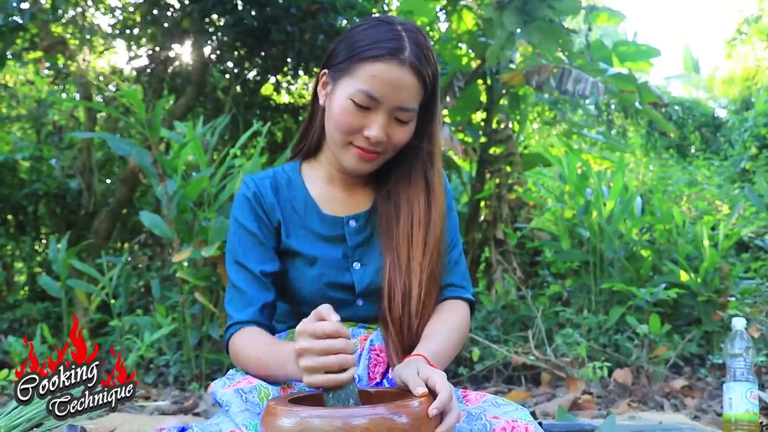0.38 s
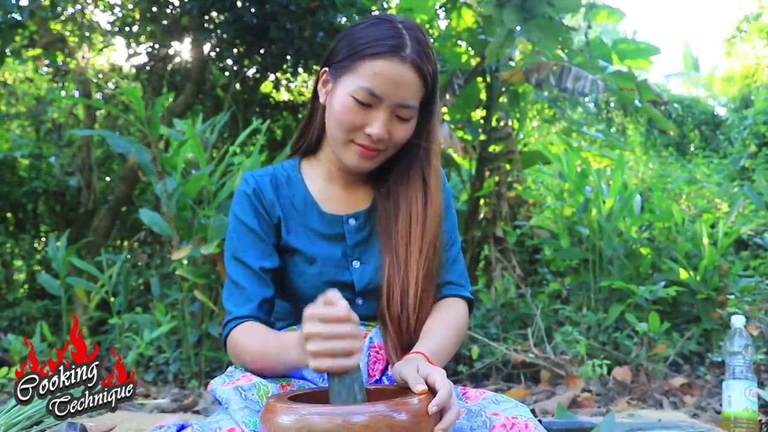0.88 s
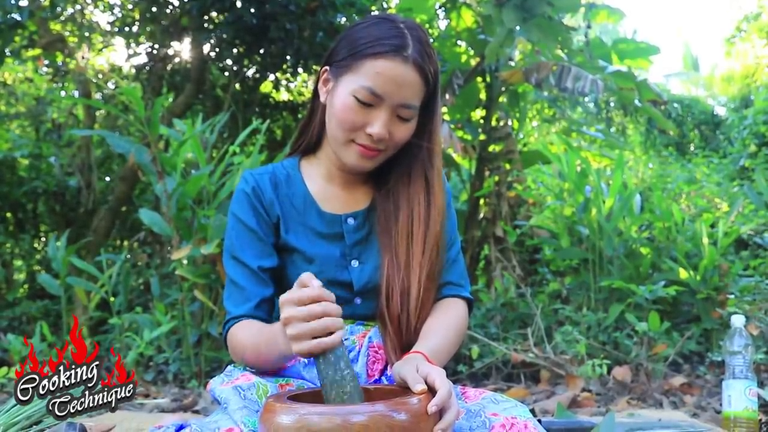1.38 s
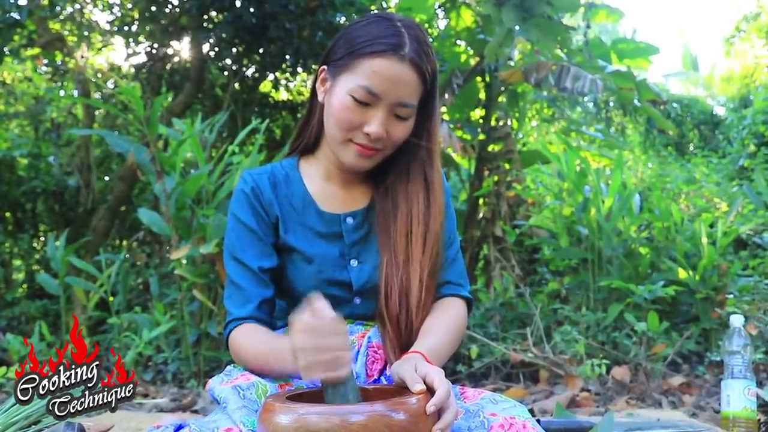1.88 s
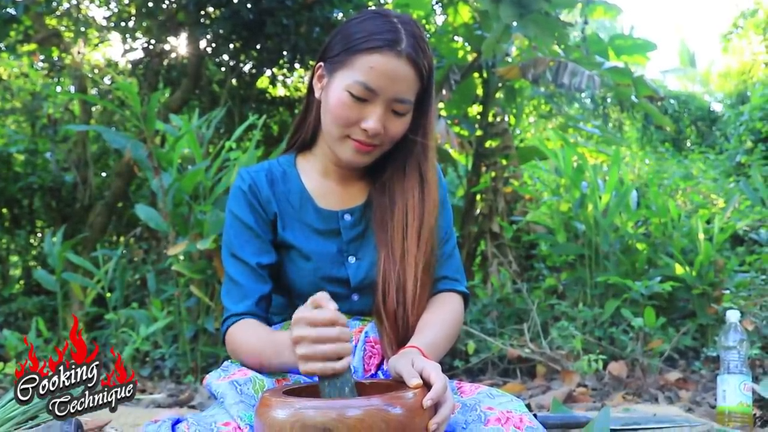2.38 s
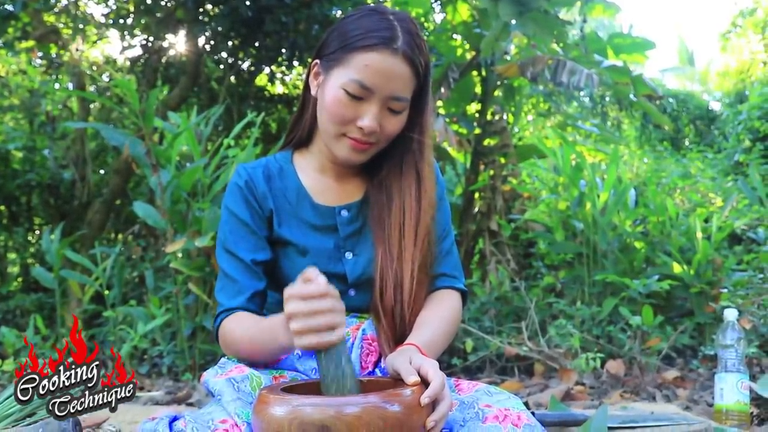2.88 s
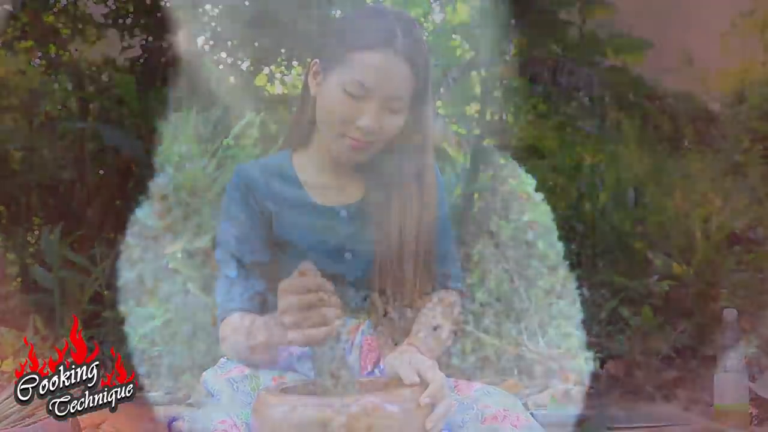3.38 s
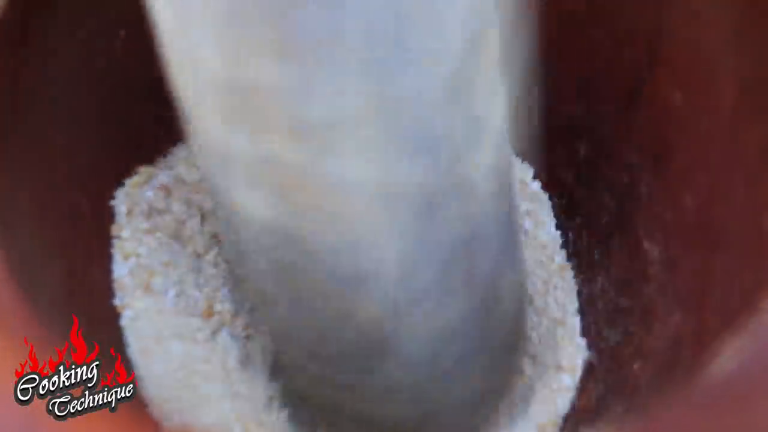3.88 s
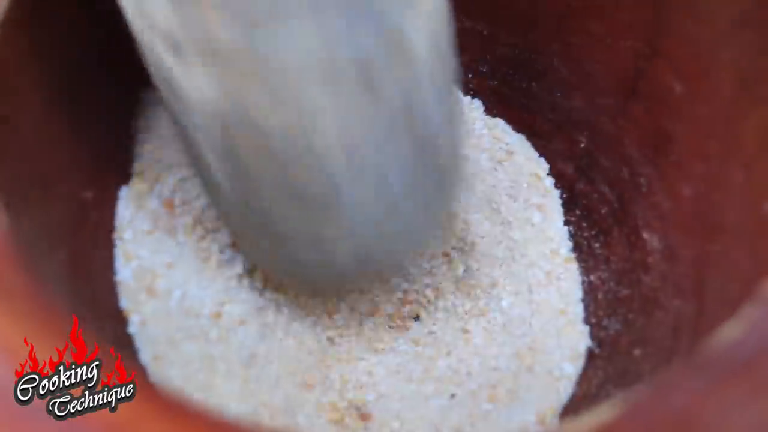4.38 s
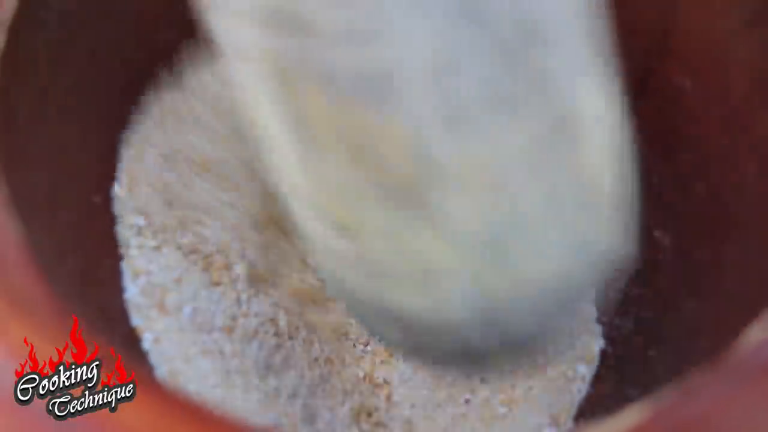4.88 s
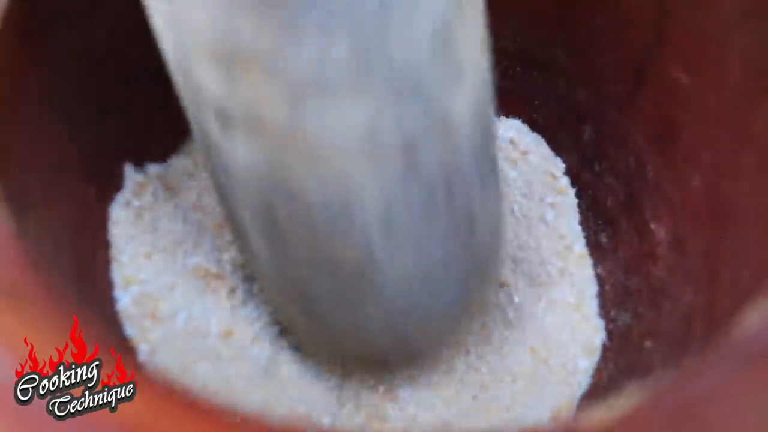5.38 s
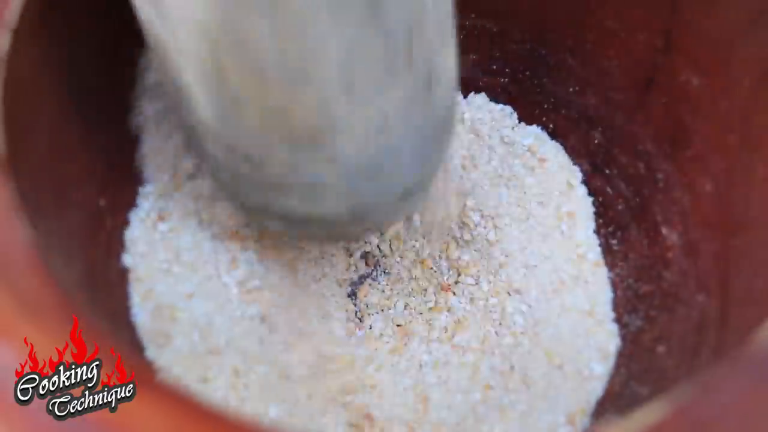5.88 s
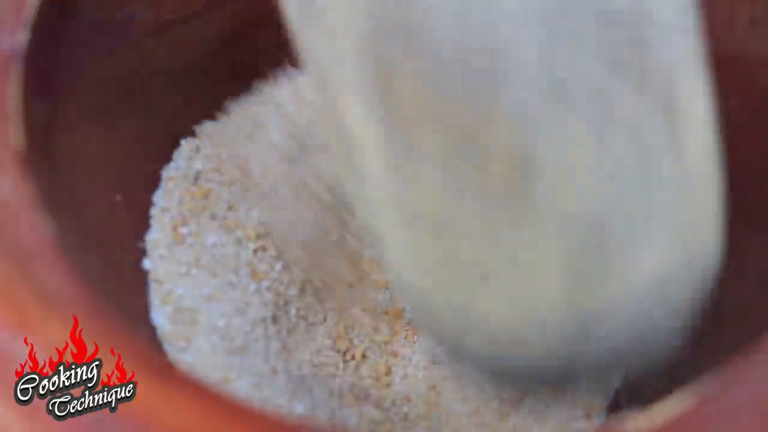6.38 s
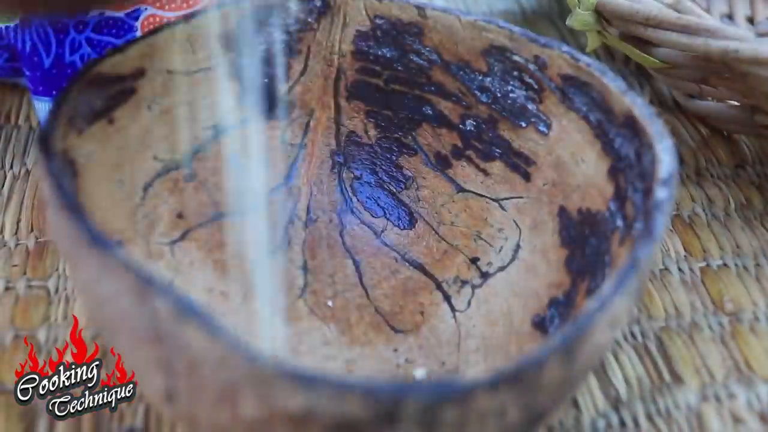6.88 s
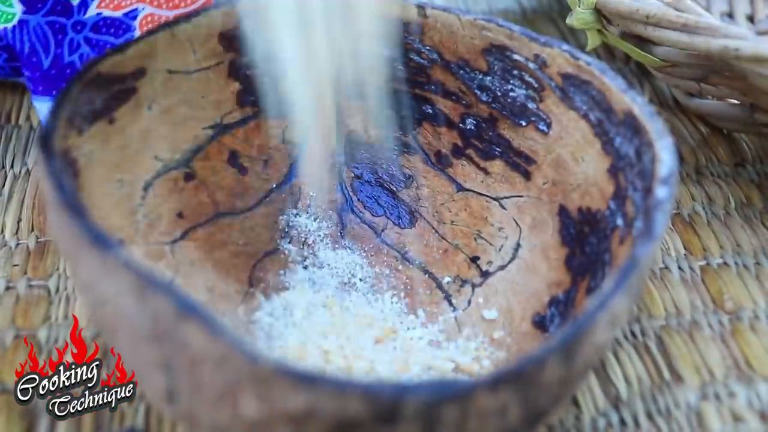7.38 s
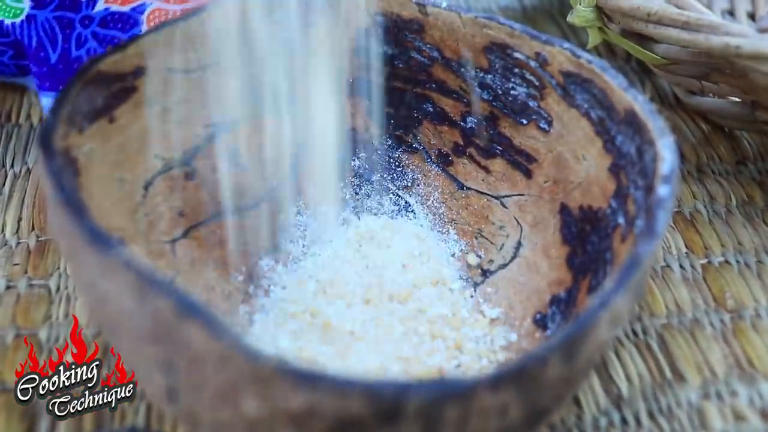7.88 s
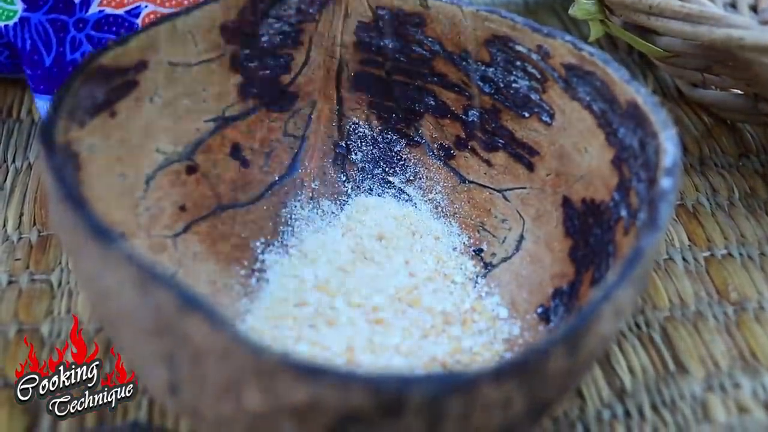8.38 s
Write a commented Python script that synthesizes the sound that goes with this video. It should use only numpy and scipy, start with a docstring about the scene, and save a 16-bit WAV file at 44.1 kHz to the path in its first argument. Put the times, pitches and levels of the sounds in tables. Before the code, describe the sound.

Outdoor pounding of grain, first from a few steps off: woody clacks with dull thuds and small puffs of grit over soft low air and insect chirps. Then the microphone is very close to the mortar, the strokes much louder and clipping, with rasping grit and cracking kernels between. The pounding stops and light dry grains patter into a hard shell bowl, with quick birdsong in the distance.

```python
"""Pounding grain outdoors

Three views of an outdoor kitchen: a pestle pounds grain in a clay mortar a few steps away, then close up, where
hard blows overload and a grinding twist follows; then grain trickles into a shell bowl. Struck modes make the blows,
random clicks the grit and patter. Garden air, insects, birds and hums are shaped noise; only the air, the lowest
close modes and the overload ceiling follow the dissolves."""
import sys
import numpy as np
from scipy import signal
from scipy.fft import rfft, irfft, next_fast_len
from scipy.io import wavfile
from scipy.ndimage import uniform_filter1d

SR = 44100
rng = np.random.default_rng(int(sys.argv[2]) if len(sys.argv) > 2 else 0)


def linear_from_db(decibels):
    """Turn decibels (scalar or array-like) into linear amplitude factors; 0 gives 1."""
    return 10 ** (np.asarray(decibels, float) / 20)


def materialize(psi):
    """Save the field psi as 16-bit PCM at rate SR to the path in sys.argv[1].

    A 1-D psi becomes a single channel; in a 2-D psi each row is a channel.
    """
    bounded = np.clip(np.atleast_2d(psi).T, -1, 1)
    quanta = np.round(bounded * 32767).astype(np.int16)
    wavfile.write(sys.argv[1], SR, quanta)


N = 375291
T = np.arange(N) / SR


def rms_one(x):
    """Scale to rms 1."""
    return x / np.sqrt(np.mean(x ** 2) + 1e-20)


def at_hz(points, hz):
    """Read a spectrum on a log frequency axis."""
    return np.interp(np.log(hz), np.log(np.array(points)[:, 0]), np.array(points)[:, 1])


def fft_grid():
    """Transform size and its bin frequencies in Hz."""
    size = next_fast_len(N)
    return size, np.maximum(np.arange(size // 2 + 1) * SR / size, 1)


def colour(x, spectrum):
    """Shape by a (Hz, dB) table; rms 1."""
    size, hz = fft_grid()
    return rms_one(irfft(rfft(x, size) * linear_from_db(at_hz(spectrum, hz)), size)[..., :N])


def tilt_right(db):
    """Left and right gains that make the right louder by db."""
    return linear_from_db([[-db / 2], [db / 2]])


def pair(alike):
    """Two noises with correlation alike."""
    mid, side = rng.standard_normal((2, N))
    alike = np.clip(alike, 0, 1)
    return np.sqrt((1 + alike) / 2) * mid + np.sqrt((1 - alike) / 2) * side * [[1], [-1]]


def flutter(rate_hz, depth_db):
    """Random wobble in dB with a new target rate_hz times a second."""
    return depth_db * np.interp(T * rate_hz, np.arange(N // 100), rng.standard_normal(N // 100))


def ring(x, hz, t60_s):
    """A resonator: a unit click sets a decaying sine of height 1 ringing."""
    radius, w = linear_from_db(-60 / (t60_s * SR)), 2 * np.pi * hz / SR
    return signal.lfilter([0, np.sin(w)], [1, -2 * radius * np.cos(w), radius * radius], x + 1e-18)


def spikes(s, sizes):
    """Clicks of given sizes at given times."""
    out = np.zeros(np.shape(sizes)[:-1] + (N,))
    out[..., np.clip(np.round(np.asarray(s) * SR).astype(int), 0, N - 1)] = sizes
    return out


def burst(s, db, rise_s, t60_s):
    """Envelopes that rise fast and die away."""
    up, down = np.exp(-1 / (rise_s * SR)), linear_from_db(-60 / (t60_s * SR))
    return signal.lfilter([1 - up], np.convolve([1, -up], [1, -down]), spikes(s, linear_from_db(db)) + 1e-18)


def strike(s, db, modes, spread_db, wide_hz):
    """Each blow gives every mode a new strength; high modes differ more between the ears."""
    out = 0
    for hz, level_db, t60_s in modes:
        draw = rng.standard_normal((len(s), 2))
        apart = draw[:, 1] * hz / (hz + wide_hz) * [[1], [-1]]
        height = linear_from_db(db + level_db + spread_db * draw[:, 0])
        out = out + ring(spikes(s, height * (1 + apart)), hz, t60_s)
    return out


def crackle(modes, envelope, alike):
    """A noisy contact drives the modes; longer rings get less drive to even out their height."""
    drive = pair(alike) * envelope
    return sum(linear_from_db(db) * ring(drive, hz, t60_s) / np.sqrt(t60_s * SR) for hz, db, t60_s in modes)


def grains(per_s, spread_db, alike):
    """Random clicks with a long tail of big ones."""
    sizes = linear_from_db(spread_db * np.minimum(rng.exponential(1, N), 4)) * (rng.random(N) < per_s / SR)
    return pair(alike) * sizes


def push(x, contact_s, cut_hz):
    """The force swells and fades over the contact time; the lowest part does not radiate."""
    shape = np.sin(np.pi * np.minimum(T[:900] / contact_s, 1)) ** 2
    soft = signal.lfilter(shape / shape.sum(), [1], x)
    return signal.lfilter(*signal.butter(2, cut_hz, "high", fs=SR), soft)


def wavering(start_s, length_s, hz0, hz1, width_hz, db, alike):
    """A narrow band of noise gliding from hz0 to hz1 under a soft window."""
    t = T[:int(length_s * SR)]
    r = np.exp(-np.pi * width_hz / SR)
    draw = rng.standard_normal((2, 2, len(t) + 4000))
    slow = signal.lfilter([1], [1, -2 * r, r * r], draw[0] + 1j * draw[1])[:, 4000:]
    mean_power = np.mean(abs(slow) ** 2)
    slow = (alike * slow[0] + np.sqrt(1 - alike ** 2) * slow) / np.sqrt(mean_power / 2)
    cycles = hz0 * t + (hz1 - hz0) * t ** 2 / (2 * length_s)
    tone = (slow * np.exp(2j * np.pi * cycles)).real
    window = np.minimum(1, np.minimum(t / 0.021, (length_s - t) / 0.032))
    out, i = np.zeros((2, N + len(t))), round(start_s * SR)
    out[:, i:i + len(t)] = linear_from_db(db) * tone * window
    return out[:, :N]


# Dissolves between views, far before and pouring after. Each row: time in seconds, share of the close view 0-1.
DISSOLVES = [(2.99, 0.0), (3.76, 1.0), (6.42, 1.0), (7.33, 0.0)]


def close_share():
    """Share of the close view over time."""
    return np.interp(T, *np.transpose(DISSOLVES))


# Likeness of the ears in garden noise. Each row: frequency in Hz, left-right correlation.
EAR_LIKENESS = [(60, 1), (240, 0.93), (950, -0.36), (3770, 0.089), (15000, -0.34)]


def air(spectrum, db):
    """Garden noise, alike in both ears in the bass only."""
    alike = np.clip(np.array(EAR_LIKENESS), [0, -.99], [SR, .99])
    mid_db, side_db = ([(hz, 10 * np.log10(1 + sign * a)) for hz, a in alike] for sign in (1, -1))
    white = rng.standard_normal((2, N))
    size, hz = fft_grid()
    gains = linear_from_db([at_hz(mid_db, hz), at_hz(side_db, hz)])
    mid, side = irfft(rfft(white, size) * gains, size)[:, :N]
    return linear_from_db(db) * colour(np.array([mid + side, mid - side]), spectrum)


# Garden air spectra in the three views. Each row: frequency in Hz, relative density in dB per Hz.
FAR_AIR = [(20, -28.5), (45, -11), (80, -5), (220, -7), (500, -14.5), (1000, -18.5), (2500, -25),
           (10000, -32), (16000, -43)]
CLOSE_AIR = [(20, -21), (45, -3.5), (100, -2.5), (320, -3.5), (500, -12), (1500, -15.5), (4000, -22),
             (8000, -26.5), (13000, -29.5), (16000, -39)]
POUR_AIR = [(20, -16.5), (45, -7), (130, 4.5), (250, -11.5), (600, -16), (1500, -20), (3400, -25.5),
            (8000, -21.5), (14000, -34.5), (16000, -37.5)]
# Rms level in dB of the far, close and pouring air.
AIR_LEVELS_DB = [-63, -61, -60.5]


def garden_air():
    """Three rumbling noise beds that cross over with the dissolves."""
    close = close_share()
    shares = [(1 - close) * (T < 5), close, (1 - close) * (T >= 5)]
    spectra = (FAR_AIR, CLOSE_AIR, POUR_AIR)
    return sum(share * air(spectrum, db) for share, spectrum, db in zip(shares, spectra, AIR_LEVELS_DB))


# Far hums, drones and whines. Each row: start in seconds, length in seconds, Hz, width in Hz, level in dB
# before flutter.
FAR_HUMS = [(0, 4.26, 76.14, 10.7, -67.5), (.2, 3.086, 454.5, 12, -76.5), (0, 3.4, 5000, 390, -81),
            (1.0, 1.4, 200, 8, -73), (6.2, .3, 780, 8, -74), (1.78, 0.595, 5000, 250, -77),
            (3.6, 2.9, 335.3, 7.2, -75), (4.86, .5, 2580, 260, -65), (6.95, 0.834, 134, 12.94, -66),
            (7.85, .5, 158, 27.3, -67.5), (7.62, 0.217, 1170, 10.73, -77.5), (7.87, .17, 1179, 8.8, -72)]


def hums():
    """Narrow noise bands that swell and sink a little; low ones are nearly alike in both ears."""
    out = 0
    for s, length_s, hz, width_hz, db in FAR_HUMS:
        alike, depth_db = (.9, 1.0) if hz < 300 else (.2, 2.5)
        out = out + wavering(s, length_s, hz, hz, width_hz, db, alike) * linear_from_db(flutter(4.6, depth_db))
    return out


# Bouts of chirping. Each row: first second, last second, period in seconds, kind, dB added to the kind's level.
CHIRP_BOUTS = [(.015, 3.4, .135, 0, 0), (2.06, 2.3, .146, 1, -8), (2.47, 3.0, .146, 1, -8),
               (3.45, 6.55, .1425, 1, 0), (3.5, 6.5, .1392, 0, 0), (6.735, 8.5, .1445, 1, 2)]
# Two kinds of insect. Each row: Hz, chirp length in seconds, width in Hz, level in dB before gate and bout.
INSECT_KINDS = [(8160, .05, 83, -79), (7710, .11, 230, -72)]


def insects():
    """Steady chirps: a narrow band gated once a period."""
    out = 0
    for first, last, period_s, kind, near_db in CHIRP_BOUTS:
        hz, chirp_s, width_hz, db = INSECT_KINDS[kind]
        phase = (T - first) % period_s / chirp_s
        gate = np.sin(np.pi * np.minimum(phase, 1)) ** .7 + .2   # a faint buzz stays between chirps
        out = out + gate * wavering(first, last - first, hz, hz, width_hz, db + near_db, alike=.3)
    return out


# Hoarse far calls. Each row: start in seconds, length in seconds, start Hz, end Hz, level in dB.
HOARSE_CALLS = [(.71, 0.095, 2750, 2450, -70.5), (2.167, .09, 2750, 2300, -60),
                (2.221, 0.14, 2700, 2575, -70.5), (3.864, 0.11, 2200, 2280, -65.5),
                (4.63, .06, 2070, 2200, -66), (5.55, .12, 2200, 2105, -69), (6.3, .22, 2200, 2150, -64.5)]
# Rising whistle: start in seconds, length in seconds, start Hz, end Hz, width in Hz, level in dB at the top.
RISING_WHISTLE = (1.63, .165, 3450, 5350, 120, -62)
# Clearer warble notes. Each row: start in seconds, length in seconds, start Hz, end Hz, level in dB.
CLEAR_NOTES = [(7.0, .11, 2300, 2080, -63.5), (7.36, 0.098, 2250, 2210, -64.5),
               (7.4, .066, 1860, 1820, -64), (7.64, .07, 1860, 1770, -64), (7.72, 0.096, 2200, 2250, -65.5),
               (7.83, 0.058, 1825, 1840, -60), (8.11, 0.058, 1900, 1800, -63)]
# Run-together echoes of the warble: start in seconds, length in seconds, start Hz, end Hz, width in Hz, level in dB.
WARBLE_ECHO = (6.5, 1.95, 2200, 1770, 800, -70.5)
# Far trills. Each row: start in seconds, length in seconds, start Hz, end Hz, width in Hz, level in dB before beating.
FAR_TRILLS = [(7.14, .2, 2910, 2777, 250, -70.5), (7.969, .23, 2990, 2790, 240, -71)]


def birds():
    """Hoarse calls, some with an octave, a whistle, a warble of quick gliding notes and two trills."""
    out = 0
    for s, length_s, hz0, hz1, db in HOARSE_CALLS:
        out = out + wavering(s, length_s, hz0, hz1, 600, db, alike=.2)
        if hz0 < 2300:
            out += wavering(s, length_s, 2 * hz0, 2 * hz1, 450, db - 3.5, alike=.2)
    along = (T - RISING_WHISTLE[0]) / RISING_WHISTLE[1]
    swell_db = 14 * np.clip(10 * (along - 2 / 3), -1, 0)   # faint until nearly two thirds of the way up
    out += wavering(*RISING_WHISTLE, alike=.2) * linear_from_db(swell_db)

    # a hundred fainter notes, unevenly spaced
    when, pitch, glide, size = rng.random((100, 4)).T
    start_s = np.interp((np.arange(100) + when) / 100, [0, 1], (6.7, 8.4))
    start_hz = np.interp(pitch, [0, 1], (1350, 2300))
    end_hz = start_hz * (0.99 + 0.1996 * glide)
    faint = zip(start_s, 0.047 + 0.052 * size, start_hz, end_hz, -76 + 8.1 * (size - .5))
    for s, length_s, hz0, hz1, db in [*CLEAR_NOTES, *faint]:
        out += wavering(s, length_s, hz0, hz1, 70, db, alike=.2)
    out += wavering(*WARBLE_ECHO, alike=.2)
    beat = 1 + .8 * np.sin(2 * np.pi * 62 * T)
    return out + sum(wavering(*trill, alike=0.22) for trill in FAR_TRILLS) * beat


# Surges in the trickle of grain. Each row: start in seconds, length in seconds, patter level in dB.
SURGES = [(6.9, 1.5, -63), (6.909, 0.176, -53), (7.243, .03, -48.5), (7.262, 0.077, -47.5),
          (7.506, 0.08, -46), (7.67, .04, -55.5), (7.842, 0.0456, -56.5), (7.984, 0.08, -58.5),
          (8.282, 0.0399, -52)]
# Louder kernels landing. Each row: time in seconds, relative peak in dB, ring in Hz.
LOUD_KERNELS = [(6.7381, -40, 6480), (6.8079, -26.5, 6390), (6.9506, -32, 5360), (6.9711, -26.5, 5570),
                (7.006, -35.5, 5000), (7.0279, -29.5, 5320), (7.0469, -30, 4640), (7.053, -33.5, 8800),
                (7.069, -35, 6000), (7.2833, -30.5, 4670), (7.3023, -27.5, 4777), (7.316, -35.5, 7000),
                (7.3464, -37.5, 4740), (7.3547, -32, 4750), (7.3941, -35.5, 5620), (7.4116, -39.5, 4427),
                (7.4275, -35.5, 5540), (7.5088, -30, 7400), (7.527, -30, 5000), (7.556, -33, 6000),
                (7.6745, -30.5, 6400), (7.8426, -31, 5760), (7.9154, -40.5, 6700), (7.9907, -41, 4723),
                (8.2866, -38, 5960)]
# Shell bowl spectrum. Each row: frequency in Hz, relative density in dB per Hz.
SHELL_SPECTRUM = [(1760, -59), (3000, -67), (3260, -57), (4140, -9.5), (4660, -5), (6000, -6),
                  (8230, -11.5), (16000, -27.5)]


def pouring():
    """Kernels patter on the shell in surges, thin and bright; single ones tick with a short ring."""
    flow = 0
    for s, length_s, db in SURGES:
        shape = np.minimum((T - s) / .004, (s + length_s - T) / (0.6187 * length_s))
        flow = flow + linear_from_db(db) * np.clip(shape, 0, 1)
    lands = np.flatnonzero(rng.random(N) < 800 / SR)   # each landing is a short rattle
    rattle_db = 3.5 * np.minimum(rng.exponential(1, len(lands)), 2)
    rattles = burst(lands / SR, rattle_db, .0002, .03)
    patter = flow * rms_one(rattles) * colour(grains(9000, 2.3, alike=0.443), SHELL_SPECTRUM)

    # sixteen lighter kernels land at random
    when, pitch, size = rng.random((16, 3)).T
    stray_s = np.interp(when, [0, 1], (6.9, 8.49))
    stray_hz = np.interp(pitch, [0, 1], (4200, 7352))
    drops = [*LOUD_KERNELS, *zip(stray_s, -47 + 8.0 * (size - .5), stray_hz)]
    s, db, _ = np.transpose(drops)
    contact = burst(s, db - 9, .0003, 0.018) + burst(s, db - 3, .0001, .004)
    ticks = colour(pair(0.28), SHELL_SPECTRUM) * contact
    for at_s, level_db, ring_hz in drops:
        start = round(at_s * SR)
        t = T[:min(900, N - start)]
        decay = linear_from_db(level_db - 9.5 - 60 * t / 0.025)
        ticks[:, start:start + len(t)] += decay * np.sin(2 * np.pi * ring_hz * t)
    return patter + signal.sosfilt(signal.butter(4, 3700, "high", fs=SR, output="sos"), ticks)


# Blows a few steps away. Each row: time in seconds, thud drive in dB, crunch drive in dB, dB added to the first
# and dB added to the second clack mode by the spot struck.
DISTANT_BLOWS = [(.015, -30, -33, -1.5, -12), (.416, -32, -36.5, -5, 6), (.808, -20.5, -34.5, 1, 4),
                 (1.186, -20, -33.5, 2, -1.5), (1.575, -19, -36.5, -15.5, -2), (1.974, -18.5, -32, 1, -10),
                 (2.369, -19, -38, -4, 0), (2.765, -14, -34.5, 2.5, 5), (3.162, -29, -33.5, 2, -16),
                 (3.569, -28.5, -41, 1, 1)]
# Far mortar and pestle modes. Each row: Hz, relative level in dB, t60 in seconds.
FAR_THUD_MODES = [(232, -11, 0.021), (378, -0.5, 0.024), (666, -13, 0.05), (920, -12, 0.03)]
FAR_CLACK_MODES = [(1460, -1, 0.028), (2170, -2.5, 0.055), (2785, -3, 0.028), (3500, -3.5, 0.03),
                   (4240, -7, 0.02), (5000, 0, 0.013)]


def far_pounding():
    """A dull thud, a clack that rings in the wood and clay, a rebound and a bright puff of grain."""
    s, thud_db, crunch_db, *spot_db = np.transpose(DISTANT_BLOWS)
    lands = s + 0.0016
    thud = 0
    for mode, trade in zip(FAR_THUD_MODES, (0, 0, .5, 0)):   # the third mode trades with the first clack mode
        thud = thud + strike(lands, thud_db - 5 - trade * spot_db[0], [mode], 2.2, wide_hz=5000)

    chance_db = [*spot_db, *np.zeros((len(FAR_CLACK_MODES) - 2, 1))]
    clack = 0
    for mode, db in zip(FAR_CLACK_MODES, chance_db):
        hit = strike(lands, crunch_db + db - 2.5, [mode], 1.5, wide_hz=12000)
        rebound = strike(s + 0.013, crunch_db - 17.5, [mode], 4.0, wide_hz=12000)
        rub = burst(s, crunch_db + db + 9, 0.0011, 0.013) + burst(s + .012, crunch_db - 11, .003, .06)
        clack = clack + hit + rebound + crackle([mode], rub, alike=0.79)

    puff = burst(s, crunch_db + 2.5, 0.0016, 0.017) + burst(s + 0.0069, crunch_db - 15, 0.0045, 0.053)
    spray = colour(pair(0.27), [(1000, -18), (3000, 0), (9000, -11), (16000, -15)]) * puff
    return (clack + spray) * tilt_right(3.5) - push(thud, 0.0013, 170)


FINE_RIGHT_DB = 6   # the finest grit is louder on the right

# Grinding twist after close blows. Each row: start in seconds, end in seconds, effort in dB, sag over the twist in dB.
PESTLE_TWISTS = [(3.237, 3.391, -47.5, 8), (3.621, 3.735, -42.5, 2.5), (3.977, 4.115, -41, 5.5),
                 (4.345, 4.475, -37.5, 4.5), (4.695, 4.825, -40, 7), (5.05, 5.185, -41, 5.5),
                 (5.407, 5.552, -38, 11.5), (5.794, 5.913, -38.5, 2.5), (6.149, 6.285, -38, 9.5),
                 (6.545, 6.682, -41.5, 2), (6.9, 7.031, -46, 9.5)]
# Kernels that crack. Each row: time in seconds, relative peak in dB.
KERNEL_CRACKS = [(3.7135, -28), (4.0856, -32.5), (4.4649, -34), (4.7222, -29.5), (5.0919, -32.5),
                 (5.1422, -30), (5.472, -25), (5.4999, -29.5), (5.8078, -31), (5.8708, -15.5),
                 (6.1674, -23.5), (6.179, -25), (6.2403, -34), (6.5606, -31), (6.5821, -29), (6.6508, -26)]
# Grit spectrum. Each row: frequency in Hz, relative density in dB per Hz.
GRIT_SPECTRUM = [(120, -25), (300, -14.5), (650, -12), (1500, -5.5), (2800, -7.5), (3400, -5.5),
                 (6500, -10.5), (7500, -15), (16000, -27.5)]
# Mortar rings under grit. Each row: Hz, width in Hz, relative level in dB.
GROUND_RINGS = [(390, 90, -13), (664, 100, -8), (1153, 40, 0.5), (1400, 130, -9.5), (2835, 150, 2.5),
                (4430, 630, -14), (6450, 300, -14)]


def grinding():
    """Dense grit under the twisting pestle, with some louder cracks; both set the mortar ringing."""
    bite_s, bite_db, lift_s, lift_db = 0.022, 8, 0.03, 18   # bites in from bite_db down, lifts off by lift_db
    effort, late_db = 0, 0
    for start, end, db, sag_db in PESTLE_TWISTS:
        times = [start, start + bite_s, end - lift_s, end + lift_s / 2]
        levels = [db - bite_db, db, db - sag_db, db - sag_db - lift_db]
        effort = effort + linear_from_db(np.interp(T, times, levels, left=-150, right=-150))
        late_db = late_db + np.interp(T, [start, end], [-10, 0], left=0)
    s, db = np.transpose(KERNEL_CRACKS)
    crack = burst(s, db - 7.5, .0003, 0.022)
    force = linear_from_db(-3.0) * uniform_filter1d(effort, size=400) + crack
    grit = rms_one(grains(3000, 4.3, alike=.65))
    grit = np.where(crack > force / 2, pair(0.47), grit)   # a crack is a solid burst, not sparse grains

    rings = 0
    for hz, width_hz, db in GROUND_RINGS:
        # the narrowest ring swells as the pestle works through to the clay
        swell_db = flutter(30, 4) + late_db * (width_hz < 60)
        level = linear_from_db(db) * np.sqrt(4 * np.pi * width_hz / SR)
        rings = rings + level * ring(grit * force * linear_from_db(swell_db), hz, 2.2 / width_hz)

    rasp = colour(grit, GRIT_SPECTRUM)
    coarse = signal.lfilter(*signal.butter(2, 2000, fs=SR), rasp)   # coarse and fine grit come and go apart
    rasp = coarse * linear_from_db(flutter(30, 3.0)) + (rasp - coarse) * linear_from_db(flutter(40, 2.0))
    fine = signal.lfilter(*signal.butter(1, 6000, "high", fs=SR), rasp)
    rasp = rasp + fine * (tilt_right(FINE_RIGHT_DB) - 1)
    return force * rasp + linear_from_db(-4.5) * rings


# Close blows and knocks. Each row: landing in seconds, thud drive in dB, crunch drive in dB, dB added to the first
# top mode by the spot struck, rebound in dB relative to the thud.
CLOSE_BLOWS = [(3.2135, -4.5, -26, -3, -9), (3.5904, 2.5, -22, 4, -26), (3.948, -23, -22, -2, -15),
               (4.2258, -53, -48, 0, -6), (4.3195, -7, -20.5, -6, -25.5), (4.6743, 2, -13.5, -9, -24),
               (5.0255, -9, -19.5, -4, -20.5), (5.387, -1, -18, 0, -24), (5.6815, -39.5, -43.5, 0, -7.5),
               (5.7701, -11, -22.5, 2, -23), (5.9835, -53, -62.5, 0, -4.5), (6.1285, 8, -18, -4, -7),
               (6.5145, 5, -16.5, 4, -26), (6.8797, -6.5, -25.5, -2, -28)]
# Close mortar modes, body then top. Each row: Hz, relative level in dB, t60 in seconds.
BODY_MODES = [(260, -11, 0.015), (400, -7.5, 0.028), (655, 5, 0.032), (780, -1, 0.024), (1125, -6, 0.028)]
TOP_MODES = [(2180, -5, 0.05), (1355, -6, .025), (2450, -4.5, 0.035), (2800, -3.5, .02), (3800, -11, .018),
             (6520, -17, 0.022)]


def close_pounding():
    """Grain crunches first, then the pestle meets the clay, presses on it and rebounds."""
    lands, thud_db, crunch_db, spot_db, rebound_db = np.transpose(CLOSE_BLOWS)
    s = lands - .0017   # the grain gives before the pestle lands

    # the two lowest modes grow less than the rest when the blow gets harder, the one above 1 kHz more
    soft_db = np.where(thud_db > -30, 0.46 * thud_db, thud_db)
    low = strike(lands, soft_db, BODY_MODES[:2], 1.2, wide_hz=4000) * np.sqrt(close_share())
    thud = strike(lands, thud_db, BODY_MODES[2:4], 1.2, wide_hz=6000)
    thud += strike(lands, 1.3 * thud_db, BODY_MODES[4:], 2.5, wide_hz=2500)
    thud += strike(lands + .009, thud_db + rebound_db, BODY_MODES[2:], 2, wide_hz=3000)
    since_s = T - lands[np.maximum(np.searchsorted(lands, T) - 1, 0)]
    press_db = -12 * np.clip((since_s - .0045) / .009, 0, 1)   # the pestle presses down and damps the body

    chance_db = [spot_db, *np.zeros((len(TOP_MODES) - 1, 1))]
    crunch = 0
    for mode, db in zip(TOP_MODES, chance_db):
        rub = burst(s, crunch_db + db + 15, .0018, 0.028)
        hit = strike(lands, crunch_db + db + 1.5, [mode], 2.0, wide_hz=8000)
        crunch = crunch + hit + crackle([mode], rub, alike=.8)
    puff = burst(s, crunch_db - 2.5, .0015, 0.02) + burst(s, crunch_db - 18, .004, .07)
    spray = colour(pair(0.036), [(1500, -11.5), (4000, 1.5), (9000, -9.0), (16000, -16.0)]) * puff
    crunch = crunch + spray * tilt_right(FINE_RIGHT_DB)
    crunch = signal.lfilter(*signal.butter(2, 1100, "high", fs=SR), crunch)   # the crunch has no body

    thump_s = 0.0079   # hard blows carry a low thump, louder on the right, that grows fast with the blow
    jolts = spikes(lands, SR * thump_s * linear_from_db(-44.5 + 1.9 * thud_db))
    thump = push(jolts, thump_s, 22) * tilt_right(4)
    return push(thud * linear_from_db(press_db), 0.0011, 440) - push(low, 0.0022, 130) + crunch + thump


def scene():
    """The sum of all sources, from the garden to the close mortar."""
    garden = garden_air() + hums() + insects() + birds()
    return garden + pouring() + far_pounding() + grinding() + close_pounding()


def band_limit(x):
    """A steep low-pass at the top of the band."""
    return signal.sosfilt(signal.butter(12, 16450, fs=SR, output="sos"), x)


def record(dry):
    """The close view overloads at full scale; the ceiling is lower in the other views."""
    ceiling = np.maximum(close_share(), .2)
    mix = np.clip(dry, -ceiling, ceiling)
    return band_limit(mix)


dry = scene()
out = record(dry)
materialize(out)
```